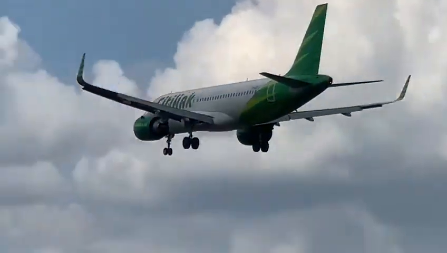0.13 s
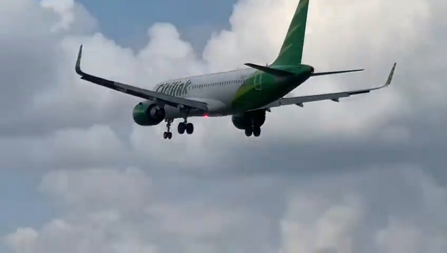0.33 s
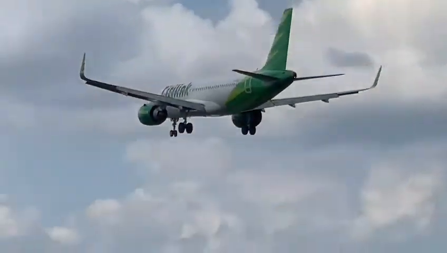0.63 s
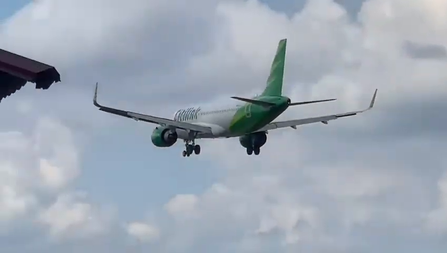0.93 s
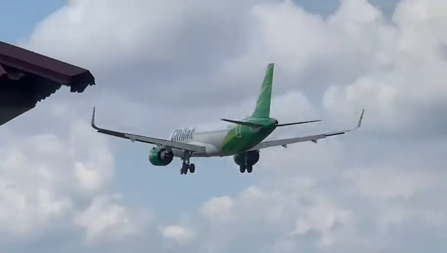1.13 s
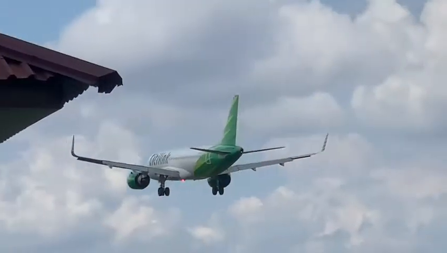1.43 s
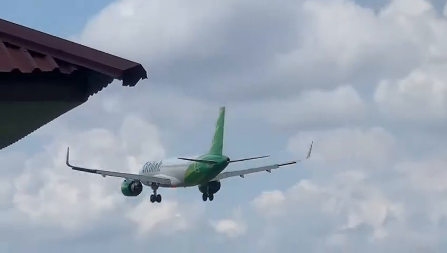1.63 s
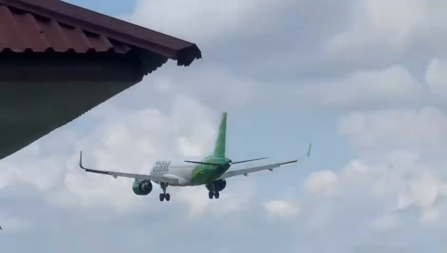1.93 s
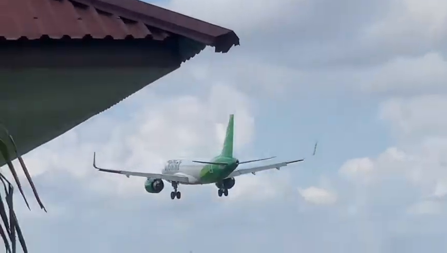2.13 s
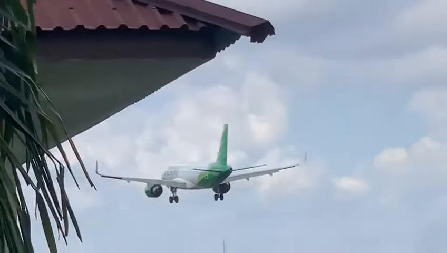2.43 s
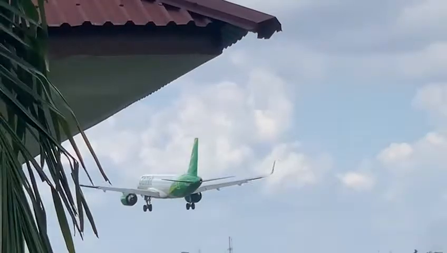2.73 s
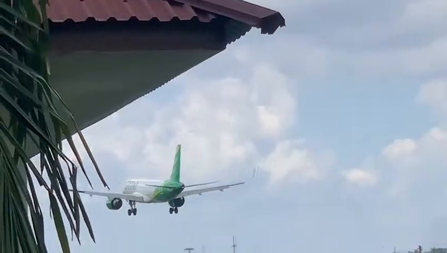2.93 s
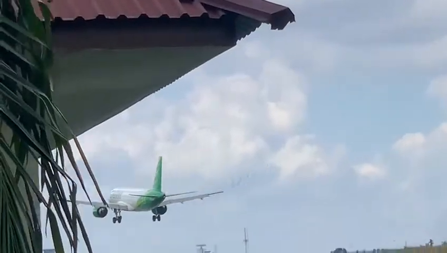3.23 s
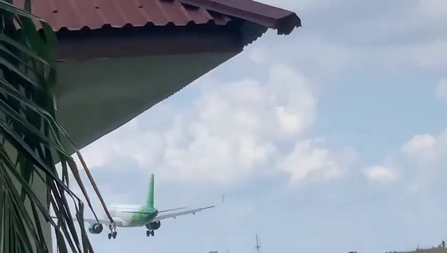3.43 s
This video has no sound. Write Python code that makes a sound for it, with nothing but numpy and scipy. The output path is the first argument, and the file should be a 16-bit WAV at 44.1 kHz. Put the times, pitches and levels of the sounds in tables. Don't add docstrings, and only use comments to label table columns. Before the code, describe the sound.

Receding passenger jet roar, dulling with distance, over a faint rooster crow and bird chirps.

```python
import sys
import numpy as np
from scipy import signal
from scipy.fft import rfft, irfft, next_fast_len
from scipy.io import wavfile
from scipy.ndimage import uniform_filter1d, map_coordinates

SR = 44100
rng = np.random.default_rng(int(sys.argv[2]) if len(sys.argv) > 2 else 0)


def materialize(psi):
    bounded = np.clip(np.atleast_2d(psi).T, -1, 1)
    quanta = np.round(bounded * 32767).astype(np.int16)
    wavfile.write(sys.argv[1], SR, quanta)


def boost(x):
    u = np.asarray(x, float) / 20
    return 10 ** u


N = 157437
T = np.arange(N) / SR

# (time [s], level [dB])
RECEDING = [(0, -29.5), (.3, -32), (.6, -33.5), (.9, -35.5), (1.3, -36), (1.65, -39), (1.8, -39.5),
            (2.2, -41), (2.5, -44), (2.65, -44), (3.1, -44), (3.57, -46)]
# (frequency [Hz], loss per dB of loudness lost [dB])
DISTANCE_LOSS = [(50, 0.5), (150, 0.46), (500, 0.4753), (2000, 1.0148), (6000, 1.06), (10500, 2)]
# (frequency [Hz], density [dB per Hz])
ROAR_SPECTRUM = [(15, -55), (25, -32), (45, -9.5), (123, -0.5), (304, -3.5), (459, -5), (522, -13),
                 (6020, -25.5), (10600, -38), (11800, -41.5), (15300, -102.5), (22000, -120)]
# (frequency [Hz], share of the patchiness [0-1])
PATCH_SHARE = [(300, .2), (900, 1)]
# (time [s], half length [s], level [dB], centre [Hz])
ROAR_SWELLS = [(0.204, 0.24, -5, 206), (0.36, 0.091, 4.5, 780), (.75, .2, 1, 950), (0.545, 0.2, 3, 150),
               (1.21, 0.24, 4.5, 260), (1.164, 0.078, -4.5, 129), (1.535, 0.15, 3, 2800),
               (1.654, 0.078, -5, 147), (1.778, .04, -7.5, 280), (2.013, .1, 3, 250), (2.095, 0.2, 2.5, 2800),
               (2.296, 0.1, 1.5, 300), (2.495, .1, 4.5, 3680), (2.75, 0.25, 4, 69), (3.25, 0.19, -1, 129),
               (3.36, 0.033, -6.5, 270)]
# (time [s], level [dB])
RUMBLE_LEVEL = [(0, -45), (.6, -41), (1.5, -40.5), (2.3, -40.5), (2.6, -37), (2.75, -41), (2.9, -39),
                (3.2, -48.5), (3.35, -38), (3.57, -36.5)]
# (time [s], level [dB])
HOWL_LEVEL = [(0, -42), (.2, -40), (.43, -34), (.54, -28), (.66, -29), (.74, -36), (.8, -31), (.855, -52),
              (.89, -31), (1.08, -35), (1.28, -33), (1.5, -38), (1.58, -48), (1.63, -36), (1.68, -41),
              (1.74, -34), (1.78, -60), (1.83, -36), (1.87, -44), (1.94, -32), (1.99, -62), (2.1, -62),
              (2.15, -36), (2.25, -33), (2.3, -60), (2.4, -60), (2.46, -32), (2.52, -60), (2.63, -34),
              (2.7, -40), (2.74, -62), (2.83, -38), (2.93, -40), (2.98, -60), (3.12, -60), (3.2, -40),
              (3.3, -52), (3.57, -50)]
# (frequency [Hz], loudest at [s], fade [s], level [dB])
ENGINE_TONES = [
    (1510, 0, 1.5, -53),
    (230, 0, .4, -39),
    (1000, 3.05, .18, -60),
    (58, 3.4, .2, -39),
]
# (frequency [Hz], density [dB per Hz])
HUM_SPECTRUM = [(200, 5), (1000, -16), (4000, -16.5), (8500, -29.5), (9400, -18.5), (9750, -60)]
# (time [s], pitch [Hz], level [dB])
CROW_SYLLABLES = [
    [(.27, 570, -75), (.29, 585, -54), (.315, 615, -53), (.335, 610, -75)],
    [(.41, 640, -75), (.43, 620, -51), (.45, 600, -55), (.47, 600, -75)],
    [(.48, 640, -75), (.5, 636, -55), (.62, 630, -56), (.8, 645, -57), (.95, 661, -54), (1.3, 660, -54),
     (1.46, 674, -59), (1.52, 645, -56), (1.565, 585, -56)],
    [(1.57, 640, -70), (1.59, 625, -55), (1.64, 630, -58), (1.67, 640, -75)],
]
# (frequency [Hz], gain [dB])
THROAT_GAIN = [(660, -16), (1320, 7.5), (1980, -4), (2650, -6), (3200, 7.5), (4000, -12), (4620, -1),
               (5400, -29)]
# (time [s], level [dB], start [Hz], middle [Hz], end [Hz])
BIRD_CHIRPS = [
    (2.105, -59, 3200, 3480, 3600),
    (2.235, -56, 3550, 3420, 3650),
    (2.35, -55, 3450, 3850, 3400),
    (2.465, -56, 3900, 3700, 3250),
    (2.52, -58, 3350, 3700, 3350),
]
# (centre [Hz], width [Hz], gain [dB])
MID_BELLS = [(81, 74, 3), (265, 65, 3.5), (543, 94, 4.5), (752, 120, 3.5), (931, 110, 4.5), (1470, 350, 2.5),
             (1770, 110, -2), (2250, 390, 4), (7300, 370, -5), (9110, 820, -10.5)]
# (centre [Hz], width [Hz], gain [dB])
BODY_DIPS = [
    (3937, 530, -5),
    (4960, 300, -9.5),
]
# (time [s], lower notch depth [times], upper notch depth [times])
GRIP_DEPTHS = [(0, .6, .5), (.42, .8, 1.2), (.6, .7, .6), (.95, 1.3, .8), (1.1, .8, 1.1), (1.28, 1, .75),
               (1.38, 2.1, .7), (1.75, 1.8, 1), (2, 1, 1.1), (2.45, .5, 1), (2.75, 1.2, .75),
               (3.57, .8, .65)]
# (frequency [Hz], side over mid [dB])
SIDE_SHARE = [(30, -13), (80, -26.5), (200, -28.5), (500, -18), (750, -3), (1500, -5), (3300, 1), (8000, 0),
              (11700, 2), (11850, -31)]
# (centre [Hz], width [Hz], gain [dB])
SIDE_DIPS = [(932, 150, -13), (1600, 220, -11.5), (2340, 360, -18), (4070, 110, -9.5), (6430, 740, -14.5),
             (10170, 1200, -44)]
# (frequency [Hz], share in quadrature [-1 to 1])
SIDE_QUADRATURE = [(700, -1.4), (1050, .6), (1900, -0.6), (2800, 0.18), (5000, -0.44), (6000, -0.26),
                   (7000, 0.79), (8000, -0.37)]
# (frequency [Hz], share in phase, left positive [-1 to 1])
SIDE_LEAN = [(700, 0), (1400, .2), (2000, 0), (2800, -.08), (5600, -.15), (9000, -0.078)]


def unit(x):
    return x / np.sqrt(np.mean(x ** 2) + 1e-20)


def along(points, hz):
    f, v = np.transpose(points)
    return np.interp(np.log(hz + 1), np.log(f + 1), v)


def curves(rows, outside=None):
    s, *cols = np.transpose(rows)
    return [np.interp(T, s, c, outside, outside) for c in cols]


def wobble(rate):
    knots = rng.standard_normal(int(N * rate / SR) + 4)
    return map_coordinates(knots, [np.arange(N) * rate / SR])


def filtered(x, response):
    m = next_fast_len(N + SR // 2)
    return irfft(rfft(x, m) * response(np.fft.rfftfreq(m, 1 / SR)), m)[..., :N]


def noise_pair(response):
    return filtered(rng.standard_normal((2, N)), response)


def band(centre_hz, wide_hz):
    return unit(noise_pair(lambda f: 1 / (1 + ((f - centre_hz) / wide_hz * 2) ** 2)))


def roar():
    roar_db, swell_db, patchy_db, swell_octaves = -28, .4, 1.5, .46
    hz, t, z = signal.stft(noise_pair(lambda f: boost(along(ROAR_SPECTRUM, f))), SR, nperseg=512)
    f = hz[:, None]
    lost_db = np.interp(t, *np.transpose(RECEDING)) - RECEDING[0][1]
    field = uniform_filter1d(rng.standard_normal(z.shape[1:]), 6, 0)
    patches = unit(uniform_filter1d(field, 12, 1))
    gain_db = along(DISTANCE_LOSS, f) * lost_db + patchy_db * along(PATCH_SHARE, f) * patches
    for s, half, db, centre in ROAR_SWELLS:
        octaves = np.log2(f / centre + 1e-9)
        gain_db = gain_db + db * np.exp(-((t - s) / half) ** 2 - (octaves / swell_octaves) ** 2)
    air = signal.istft(z * boost(gain_db), SR, nperseg=512)[1][:, :N]
    opening_rms = np.sqrt(np.mean(air[:, :SR // 2] ** 2))
    return air / opening_rms * boost(roar_db + swell_db * wobble(5.23))


def ground_echo(air):
    delay_s, growth_per_s, echo_db, top_hz = 0.0082, 0.037, -15.5, 332
    late = np.arange(N) - SR * delay_s * (1 + growth_per_s * T)
    bass = filtered(air, lambda f: 1 / (1 + (f / top_hz) ** 4))
    return boost(echo_db) * np.array([np.interp(late, np.arange(N), v) for v in bass])


def rumble():
    return boost(curves(RUMBLE_LEVEL)[0] - 1) * band(60, 24)


def twin(x):
    return np.array([x, np.roll(x, 400)])


def howl():
    howl_hz, sag_hz, sag_s, rough, rough_wide_hz = 452.2, 11, 1.6, .25, 16
    pitch = howl_hz + sag_hz * np.exp(-T / sag_s) + 0.75 * wobble(5.07)
    turn = 2 * np.pi * np.cumsum(pitch) / SR
    unsteady = rough * band(0, rough_wide_hz)
    tone = (1 + unsteady[0]) * np.sin(turn) + unsteady[1] * np.cos(turn)
    return twin(boost(curves(HOWL_LEVEL)[0]) * np.sqrt(2) * tone)


def engine_whines():
    out = np.zeros(N)
    for hz, s, fade, db in ENGINE_TONES:
        level = boost(db - 6 * ((T - s) / fade) ** 2 + 3 * wobble(9))
        out += level * np.sqrt(2) * np.sin(2 * np.pi * hz * T + 1.1 * wobble(11))
    return twin(out)


def neighbourhood():
    return boost(-47.5) * unit(noise_pair(lambda f: boost(along(HUM_SPECTRUM, f))))


def insects():
    pulse_rate_hz, pulse_db = 7.6, 5
    beat_db = pulse_db * np.cos(2 * np.pi * pulse_rate_hz * (T - 2.52) + .6 * wobble(2.3))
    hiss = boost(-64.5 + 1.3 * wobble(8) + .4 * beat_db) * band(8095, 606)
    return hiss + boost(-77 + beat_db) * band(8620, 450)


def rooster():
    out, shake = np.zeros(N), 1 + 0.0024 * wobble(61.1)
    flutter_db = [3 * wobble(12.7) for _ in range(8)]
    for rows in CROW_SYLLABLES:
        pitch = curves(rows)[0] * shake
        db = curves(rows, -200)[1]
        turn = 2 * np.pi * np.cumsum(pitch) / SR
        for k in range(1, 9):
            level = boost(db + along(THROAT_GAIN, k * pitch) + flutter_db[k - 1])
            out += level * np.sqrt(2) * np.sin(k * turn)
    return out


def bird():
    chirp_s, husky, husky_hz = .052, .6, 250
    out, u = np.zeros(N), np.linspace(0, 1, int(chirp_s * SR))
    swell = np.sqrt(np.sin(np.pi * u).clip(0))
    for s, db, *bend_hz in BIRD_CHIRPS:
        hz = np.polyval(np.polyfit([0, .5, 1], bend_hz, deg=2), u)
        chirp = swell * np.sin(2 * np.pi * np.cumsum(hz) / SR)
        out[int(s * SR):][:len(u)] += boost(db) * chirp
    out = out * (1 + husky * band(0, husky_hz)[0])
    return out + 0.47 * np.roll(out, 1100)


def aside(x):
    pan_db, lag_s = np.array([[2.5], [-2.5]]), np.array([[0], [0.00018]])
    return filtered(np.array([x, x]), lambda f: boost(pan_db) * np.exp(-2j * np.pi * f * lag_s))


def dips(rows, f, t):
    at = np.clip(t * SR, 0, N - 1).astype(int)
    total_db = 0
    for centre, width, db in rows:
        depth_db = db * (1 + .3 * wobble(5.24)[at])
        moved_hz = centre * (1 + .012 * wobble(1.5)[at])
        total_db = total_db + depth_db * np.exp(-((f - moved_hz) / width * 2) ** 2)
    return boost(total_db)


def ports(pair):
    hz, t, z = signal.stft(pair, SR, nperseg=1024)
    f = hz[:, None]
    link = np.clip(along(SIDE_QUADRATURE, f), -1, 1)
    scattered = (1j * link + along(SIDE_LEAN, f)) * z[0] + np.sqrt(1 - link ** 2) * z[1]
    side = boost(along(SIDE_SHARE, f)) * dips(SIDE_DIPS, f, t) * scattered
    mid = dips(MID_BELLS, f, t) * (f < 11200) * z[0]
    for row, depth in zip(BODY_DIPS, curves(GRIP_DEPTHS)):
        mid = mid * dips([row], f, t) ** np.interp(t, T, depth)
    return signal.istft(np.array([mid + side, mid - side]), SR, nperseg=1024)[1][:, :N]


def scene():
    air = roar()
    aircraft = air + ground_echo(air) + rumble() + howl() + engine_whines()
    return ports(aircraft + neighbourhood() + insects()) + aside(rooster() + bird())


def top_cut(x):
    return signal.sosfilt(signal.butter(12, 11850, fs=SR, output="sos"), x)


def record(dry):
    mix = dry * np.clip(T[::-1] / .003, 0, 1)
    return top_cut(mix)


dry = scene()
out = record(dry)
materialize(out)
```